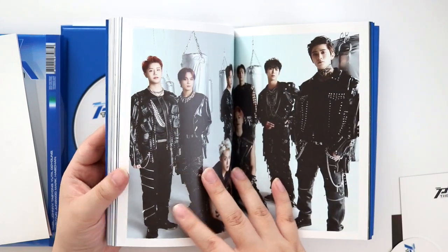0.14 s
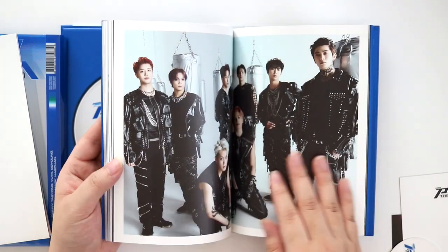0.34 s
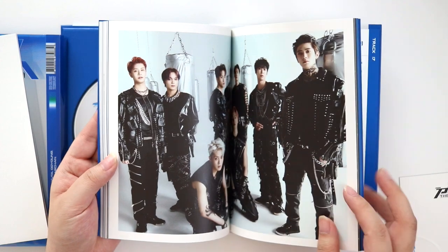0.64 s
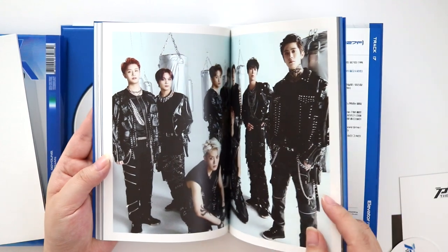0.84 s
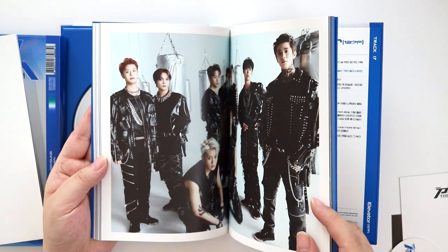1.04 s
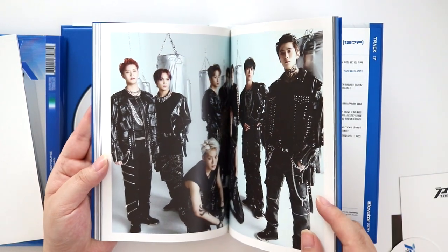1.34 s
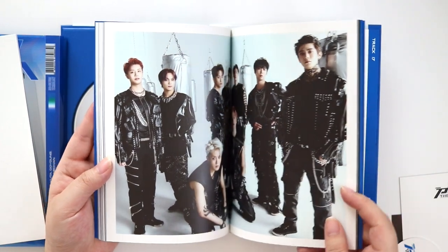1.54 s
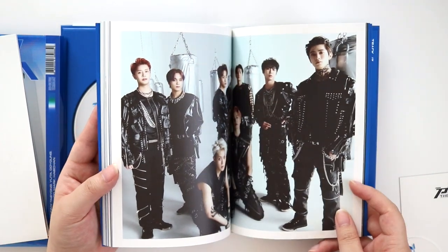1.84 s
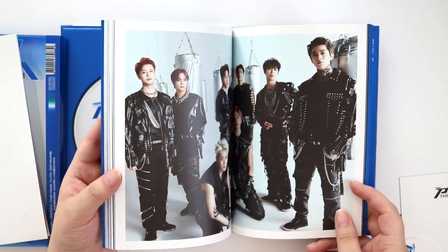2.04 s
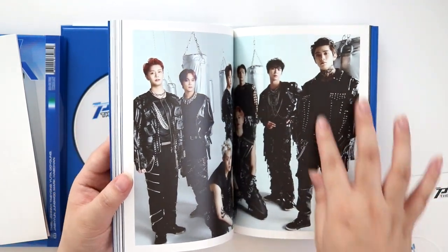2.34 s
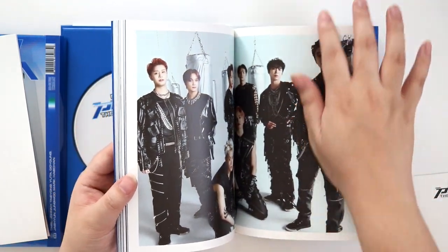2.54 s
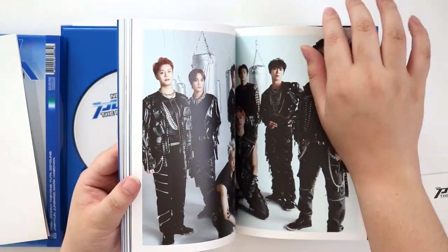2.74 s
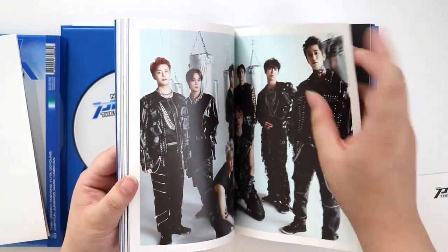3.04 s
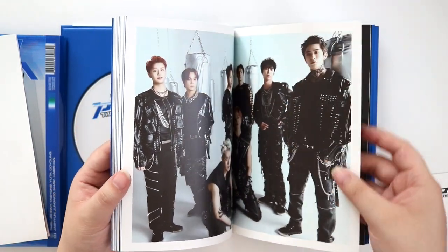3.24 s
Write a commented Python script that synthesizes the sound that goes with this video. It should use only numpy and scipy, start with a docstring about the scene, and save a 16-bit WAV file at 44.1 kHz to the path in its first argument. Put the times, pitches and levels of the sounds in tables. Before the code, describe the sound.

Glossy book pages handled up close: a hand rubs across paper, small ticks follow, a block of pages slaps down, then one sheet crackles and snaps twice; small quiet room, close stereo microphone.

```python
"""A faint fingertip rub opens a close stereo take of a glossy photo book on a table in a small, quiet room.
A hand slides over the page; a thumb lifts a block of pages and lets it slap down; the hand slides up,
peels one sheet off with a crackle and a double snap, and rubs down its edge.
Friction is coloured noise with tiny random slips; the slap is a bank of decaying sines, the snaps are
filtered clicks. Short wall reflections, air noise, a mains hum and a low fan drone lie behind it."""
import sys
import numpy as np
from scipy import signal
from scipy.fft import rfft, irfft
from scipy.io import wavfile
from scipy.ndimage import uniform_filter1d

SR = 44100
rng = np.random.default_rng(int(sys.argv[2]) if len(sys.argv) > 2 else 0)


def log_audio(samples):
    """Write samples as a 16-bit WAV file to the path given in sys.argv[1]."""
    # one column per channel
    frames = np.atleast_2d(samples).T
    # limit to full scale, then quantise
    limited = np.clip(frames, -1, 1)
    pcm = np.round(limited * 32767).astype(np.int16)
    wavfile.write(sys.argv[1], SR, pcm)


N = 149940

# colour of the snapping sheet, shared by its crackle and its snaps: pitch_hz [Hz], relative_level_db [dB]
SHEET_COLOUR = [(100, -22), (550, -15), (850, -2), (1250, -2), (1700, -3), (2200, 1.5), (2700, -2),
                (3400, 6), (4200, -19), (5300, -9), (6500, -4), (8000, -24), (15000, -30)]

GRAIN_SHARE = 0.32  # share of friction power in separate slips
WIDE_HZ, SNAP_WIDE_HZ = 4300, 8740  # the stereo image opens around these pitches


def undb(db):
    """Decibels to gain."""
    return 10 ** (np.asarray(db) / 20)


def unit(x):
    """Scale to rms 1."""
    return x / np.sqrt(np.mean(x ** 2))


def clock():
    """Time of every sample in seconds."""
    return np.arange(N) / SR


def pan(db):
    """Gains of left and right; db is how much louder the left becomes."""
    return undb(np.array([[db], [-db]]) / 2)


def ring(x, impulse):
    """Play x through an impulse response."""
    return signal.fftconvolve(np.atleast_2d(x), np.atleast_2d(impulse), axes=1)[:, :N]


def add(out, start_s, sound):
    """Mix a sound in at a time."""
    i = int(start_s * SR)
    out[..., i:i + sound.shape[-1]] += sound[..., :N - i]


def band(x, hz, width_hz):
    """One broad or narrow resonance."""
    g, k = np.tan(np.pi * hz / SR), width_hz / hz
    return signal.lfilter([g * k, 0, -g * k], [1 + g * k + g * g, 2 * g * g - 2, 1 - g * k + g * g], x)


def edge(x, hz, kind, order):
    """Low-pass or high-pass."""
    return signal.sosfilt(signal.butter(order, hz, kind, fs=SR, output="sos"), x)


def response(points, size=4096):
    """Causal impulse response of a colour, with unit energy."""
    hz, db = np.array(points).T
    bin_hz = np.arange(size // 2 + 1) * SR / size
    gain_db = np.interp(np.log(bin_hz + 1), np.log(hz), db)
    # folding the cepstrum puts the energy as early as possible
    cepstrum = irfft(np.log(undb(gain_db)))
    cepstrum[1:size // 2] *= 2
    cepstrum[size // 2 + 1:] = 0
    impulse = irfft(np.exp(rfft(cepstrum)))
    return impulse / np.linalg.norm(impulse)


def stereo(pair, wide_hz, least=0.14):
    """Two signals as middle and side: bass is central, treble wide."""
    f = np.arange(N // 2 + 1) * SR / N
    side = irfft(rfft(pair[1]) * (least + f ** 2 / (f ** 2 + wide_hz ** 2)), N)
    return np.array([pair[0] + side, pair[0] - side])


def walk(hz):
    """Smooth random wander of rms 1, moving to a new value hz times a second."""
    k = max(int(SR / hz), 2)
    steps = np.repeat(rng.standard_normal(N // k + 1), k)
    return unit(uniform_filter1d(steps, k)[:N])


def friction(share):
    """Tiny slips of uneven size over a smooth hiss, with a slight judder."""
    slips_per_s, spread_db, judder_db, judder_hz = 3000, 1.5, 0.66, 70.6
    slips = (rng.random((2, N)) < slips_per_s / SR) * rng.standard_normal((2, N))
    slips = slips * undb(spread_db * np.minimum(rng.exponential(size=(2, N)), 4))
    hiss = rng.standard_normal((2, N))
    contact = np.sqrt(share) * unit(slips) + np.sqrt(1 - share) * hiss
    return contact * undb(judder_db * walk(judder_hz))


def patchy(x, count=14):
    """The contact keeps shifting: each half octave swells and fades on its own, the top least."""
    swell_db, rate_hz = 2.0, 22
    f = np.arange(N // 2 + 1) * SR / N
    place = np.clip(2 * np.log2((f + 1) / 180), 0, count - 1)  # half octaves above 180 Hz
    spectrum = rfft(x)
    depth_db = swell_db * np.minimum(1, 2 * (1 - np.arange(count) / count))
    out = 0
    for k in range(count):
        part = irfft(spectrum * np.maximum(1 - np.abs(place - k), 0), N)
        out = out + part * undb(depth_db[k] * walk(rate_hz))
    return unit(out)


def slide(curve, colour, wide_hz, share):
    """Friction on paper with coarser random catches, following the pressure of the stroke."""
    catches_per_s, catch_db, catch_hz = 140, -11.5, 2500  # catch level relative to the friction
    s, db = np.array(curve).T
    t = clock()
    outside_s = np.maximum(s[0] - t, 0) + np.maximum(t - s[-1], 0)
    pressure = undb(np.interp(t, s, db)) * np.exp(-outside_s / 0.0097)
    catches = (rng.random((2, N)) < catches_per_s / SR) * rng.uniform(-1, 1, (2, N))
    catches = unit(band(band(catches, catch_hz, catch_hz), catch_hz / 2, 2 * catch_hz))
    rubbing = ring(friction(share), response(colour)) + undb(catch_db) * catches
    return stereo(patchy(rubbing), wide_hz) * pressure


def swells(table, skew, rough_db):
    """Short strokes that rise, stutter and fade, each in its own resonance."""
    out = np.zeros((2, N))
    grain = friction(GRAIN_SHARE) * undb(rough_db * walk(130))
    for start_s, length_s, db, hz, width_hz in table:
        u = (clock() - start_s) / length_s
        on = (u > 0) & (u < 1)
        stroke = unit(band(band(grain, hz, width_hz), hz, 3 * hz)[:, on])
        out[:, on] += stroke * np.sin(np.pi * u[on] ** skew) * undb(db)
    return stereo(out, WIDE_HZ)


def tick(hz, scatter_s):
    """A click and its quickly fading after-slips in a paper resonance; middle peak is 1."""
    t = clock()[:SR // 8]
    push = rng.standard_normal((2, len(t))) * np.exp(-t / scatter_s)
    push[0, 0] += 3
    y = edge(band(push, hz, 1.96 * hz), 1.59 * hz, "low", order=4)
    return y / np.abs(y[0]).max()


def book_ring():
    """One blow: the cover rings at once, the heavier body follows; no mode radiates far below its pitch."""
    # modes of book and table: pitch_hz [Hz], level_db [dB, before high-pass and blow], t60_s [s], delay_s [s]
    modes = [(181, -35.5, 0.068, 0.0038), (213.4, -21, .14, 0.0017), (326, -26.5, 0.059, .003),
             (445.7, -29.5, 0.13, .003), (966, -9, 0.022, 0.0001), (960, -35, .09, 0.01),
             (1188, -21.5, .035, 0.0041), (1670, -12, 0.016, .0003), (2745, -15.5, 0.013, 0),
             (3380, -26.5, 0.011, .0005)]
    out = 0
    for hz, db, t60_s, delay_s in modes:
        t = np.maximum(clock()[:SR // 2] - delay_s, 0)
        mode = np.sin(2 * np.pi * hz * t) * np.exp(-np.log(1000) * t / t60_s)
        out = out + undb(db) * edge(mode, 0.7 * hz, "high", order=3)
    return out


def slap():
    """The page block hits the cover; the sheets rattle and settle."""
    slap_s, blow_db, crack_db, crack_hz = 2.2091, -2, -23, 2940
    settle_db, settle_s, settle_hz = -36.5, 0.019, 1250
    out, since = np.zeros((2, N)), clock() - slap_s
    add(out[0], slap_s, undb(blow_db) * book_ring())
    add(out, slap_s - .0005, undb(crack_db) * tick(crack_hz, 0.0015))
    settle = unit(band(band(friction(GRAIN_SHARE), settle_hz, 1400.0), settle_hz, 2800.0))
    out += undb(settle_db) * settle * (since > 0) * np.exp(-np.abs(since) / settle_s)
    return stereo(out, SNAP_WIDE_HZ) * pan(-.9)


def flick():
    """One sheet crackles under the finger and snaps free; its edge flutters and rings briefly."""
    # the sheet snaps free: start_s [s], level_db [dB over one millisecond, before stereo and pan]
    snaps = [(2.968, -22), (2.9797, -20.5), (2.9803, -13.5), (2.9829, -18), (2.9836, -19.5)]
    # stick-slip of the corner under the finger: time_s [s], level_db [dB, before stereo and pan]
    peel = [(2.9, -56), (2.945, -43.5), (2.955, -35), (2.96, -28), (2.965, -19), (2.969, -24), (2.972, -39),
            (2.98, -53)]
    flutter, flutter_s = 0.3, 0.00071  # share of the push, decay time
    ring_share, ring_hz, ring_width_hz = 0.83, 2190, 410
    out, t = np.zeros((2, N)), clock()[:SR // 50]
    for start_s, db in snaps:
        push = flutter * rng.standard_normal((2, len(t))) * np.exp(-t / flutter_s)
        push[0, 0] += 1
        click = ring(push, response(SHEET_COLOUR))
        click = click + ring_share * band(click, ring_hz, ring_width_hz)
        add(out, start_s, undb(db) * click * np.sqrt(SR / 1000) / np.linalg.norm(click[0]))
    crackle = slide(peel, SHEET_COLOUR, SNAP_WIDE_HZ, share=0.73)
    return (stereo(out, SNAP_WIDE_HZ) + crackle) * pan(-3.5)


def sheet_sweep():
    """The lifted sheet sweeps over the next one as paper-on-paper friction."""
    # strength of the sweep: time_s [s], level_db [dB, before stereo and pan]
    strength = [(2.87, -51.5), (2.91, -50.5), (2.93, -43), (2.96, -40), (2.99, -35), (3.01, -38),
                (3.05, -38.5), (3.08, -47), (3.105, -45.5), (3.14, -65)]
    # its colour: pitch_hz [Hz], relative_level_db [dB]
    sweep_colour = [(150, -21), (330, -18), (630, -11.5), (940, -1), (1550, -22), (2500, 0.5), (3280, -2),
                    (4300, -5), (8500, -6), (15000, -22)]
    return slide(strength, sweep_colour, WIDE_HZ, GRAIN_SHARE) * pan(-1)


def hand_slides():
    """Skin rubs on glossy paper: out over the page, up the page, then down the sheet's edge."""
    # pressure of each stroke: time_s [s], level_db [dB, before stereo]
    out_stroke = [(.21, -53.5), (.245, -45.5), (.3, -44.5), (.35, -41.5), (.39, -46), (.49, -50),
                  (.57, -50.5), (.61, -45.5), (.65, -50.5), (.69, -59)]
    up_stroke = [(2.215, -46), (2.24, -47.5), (2.3, -49.5), (2.46, -46.5), (2.52, -47.5), (2.6, -52),
                 (2.7, -58.5), (2.86, -56)]
    edge_stroke = [(3.15, -53.5), (3.19, -45.5), (3.3, -47.5), (3.33, -45), (3.4, -47)]
    # colour of each stroke: pitch_hz [Hz], relative_level_db [dB]
    out_colour = [(200, -21), (400, -16), (620, -20), (880, 0), (1400, -12), (2000, -6.5), (3400, -1.5),
                  (6000, -4.5), (9500, -6.5), (15000, -14)]
    up_colour = [(200, -28), (420, -8.5), (620, -20), (930, -3.5), (1750, -10), (4400, -1), (5600, -5),
                 (10700, -6), (15500, -16)]
    edge_colour = [(200, -14), (450, -11), (640, -14.5), (1020, -2.5), (1350, -13), (1850, -6.5),
                   (2600, -2), (3900, -7.5), (6000, -3.5), (8500, -9.5), (15000, -19)]
    strokes = [(out_stroke, out_colour), (up_stroke, up_colour), (edge_stroke, edge_colour)]
    return sum(slide(curve, colour, WIDE_HZ, GRAIN_SHARE) for curve, colour in strokes)


def ticks():
    """Fingers catch page edges and softly knock the book, whose ring is dulled by the fingertip."""
    # start_s [s], peak_db [dB, before stereo and pan], pitch_hz [Hz], scatter_s [s],
    # body_db [dB, book ring relative to the tick]
    touches = [(0.166, -30, 3400, 0.0054, -16), (.195, -30, 1900, 0.0015, -19),
               (0.523, -34, 3600, 0.006, -23), (0.699, -35, 1400, 0.0011, -13),
               (0.7041, -37, 2690, 0.001, -27), (0.892, -27, 2800, 0.0012, -11),
               (1.630, -43.5, 1490, 0.0057, -21), (2.108, -30.5, 2320, 0.0024, -8),
               (2.7635, -26.5, 4900, 0.0023, -14), (2.826, -35.5, 3030, .003, -9),
               (2.8705, -30.5, 3500, 0.0028, -17), (3.1543, -31, 2800, 0.0023, -12),
               (3.189, -32, 2170, 0.008, -15)]
    out, body = np.zeros((2, N)), edge(book_ring(), 1020, "low", order=2)
    for start_s, db, hz, scatter_s, body_db in touches:
        add(out, start_s, undb(db) * tick(hz, scatter_s))
        add(out[0], start_s, undb(db + body_db) * body / np.abs(body).max())
    return stereo(out, SNAP_WIDE_HZ) * pan(-3)


def finger_rubs():
    """Short fingertip rubs and scrapes on the pages and their edges, as bursts of resonant friction."""
    # start_s [s], length_s [s], level_db [dB, before swell and stereo], pitch_hz [Hz], width_hz [Hz]
    scrapes = [(-.02, 0.056, -53.5, 3000, 5000), (.146, 0.035, -45.5, 4240, 3540),
               (.14, 0.069, -50.5, 1300, 2200), (.31, 0.08, -50, 875, 219), (.315, 0.069, -43.5, 3600, 900),
               (.445, 0.032, -53, 1940, 300), (.595, 0.094, -51, 960, 350), (.69, 0.15, -57, 3320, 5000),
               (.828, 0.039, -52, 3300, 2500), (.893, 0.045, -53, 400, 400), (1.051, .032, -48, 3150, 700),
               (1.621, 0.019, -57, 4260, 1200), (1.627, 0.016, -47.5, 1400, 1300),
               (1.63, 0.16, -58, 2000, 5000), (1.95, 0.33, -57.5, 2180, 4040),
               (2.04, 0.073, -54, 2420, 1100), (2.075, 0.055, -52.5, 6940, 4500),
               (2.102, .024, -49, 1010, 400), (2.895, 0.08, -48.5, 990, 500),
               (2.951, 0.017, -30.5, 1000, 600), (3.155, 0.019, -36, 750, 200),
               (3.154, 0.026, -41, 2500, 500), (3.188, .028, -47, 2800, 1000)]
    return swells(scrapes, skew=0.75, rough_db=2.0)


def air_puffs():
    """Soft low puffs of air pushed by the moving sheet and hand, as low resonant noise."""
    # start_s [s], length_s [s], level_db [dB, before swell and stereo], pitch_hz [Hz], width_hz [Hz]
    gusts = [(2.95, 0.13, -45.5, 144, 130), (3.14, 0.085, -49, 157, 39), (0.19, 0.54, -56.5, 150, 61)]
    return swells(gusts, skew=0.74, rough_db=-3)


def walls(x):
    """Short, slightly dull reflections of the room: a decaying noise tail after a 5 ms gap."""
    t60_s, level_db, width_hz = 0.26, -12.5, 5200
    t = clock()
    tail = rng.standard_normal((2, len(t))) * np.exp(-np.log(1000) * t / t60_s) * (t > .005)
    tail = stereo(band(tail, 810.0, width_hz), 1550.0, least=0.22)
    return undb(level_db) * ring(x.mean(axis=0), tail / np.linalg.norm(tail[0]))


def room_tone():
    """Steady air noise with a wavering mains hum and a low fan drone of narrow-band noise."""
    # colour of the air: pitch_hz [Hz], relative_level_db [dB]
    air_colour = [(25, -24), (55, -7), (125, -6.5), (180, -4.5), (230, -10), (420, -14), (1040, -15.5),
                  (2050, -20.5), (4000, -23.5), (9300, -27), (15500, -35)]
    # air and drone levels stand before stereo; the hum wanders around its own
    air_db, hum_hz, hum_db, drone_hz, drone_db = -56, 98.5, -65.5, 265.8, -62.5
    air = undb(air_db) * ring(rng.standard_normal((2, N)), response(air_colour))
    drone = band(band(rng.standard_normal((2, N)), drone_hz, 45.0), drone_hz, 45.0)
    drone = undb(drone_db) * unit(drone)
    hum = np.sqrt(2) * np.sin(2 * np.pi * hum_hz * clock() + 0.5 * walk(9.2))
    hum = undb(hum_db + 3.3 * walk(5.46)) * hum
    return stereo(air + drone, 2800.0, least=0.52) + hum


def scene():
    """Hands, paper and book close to the microphones, then the room around them."""
    sheet = flick() + sheet_sweep() + air_puffs()
    near = slap() + sheet + hand_slides() + ticks() + finger_rubs()
    return near + walls(near) + room_tone()


def record(dry):
    """The top is cut steeply above 15850 Hz."""
    return signal.sosfilt(signal.ellip(10, .1, 80, 15850, fs=SR, output="sos"), dry)


dry = scene()
out = record(dry)
log_audio(out)
```